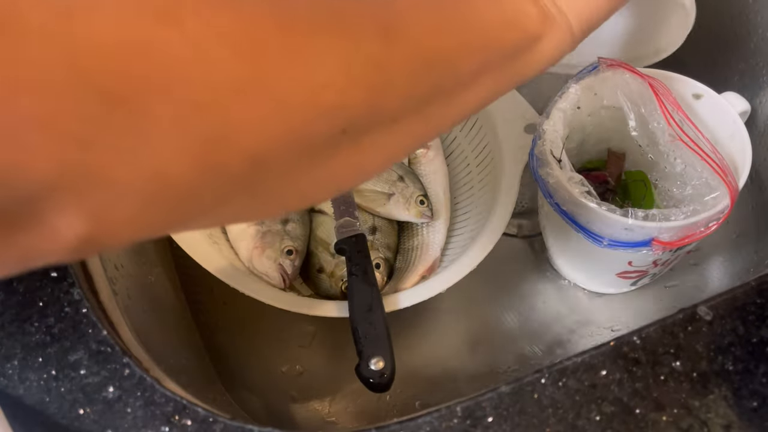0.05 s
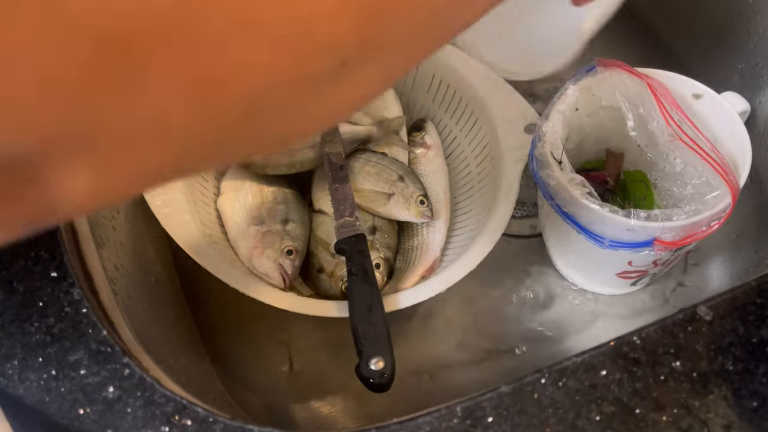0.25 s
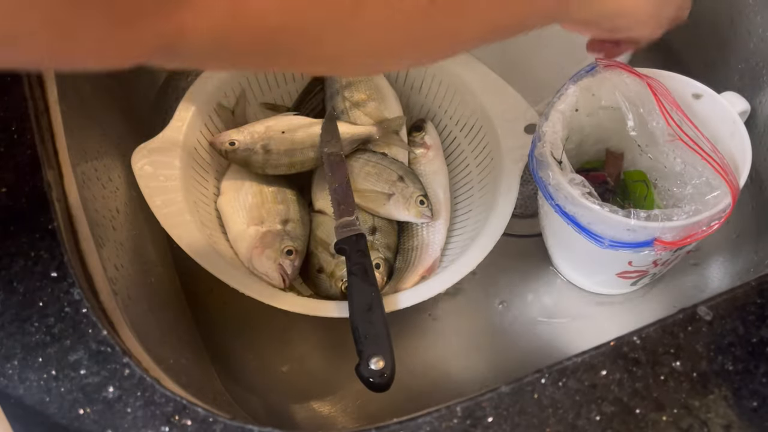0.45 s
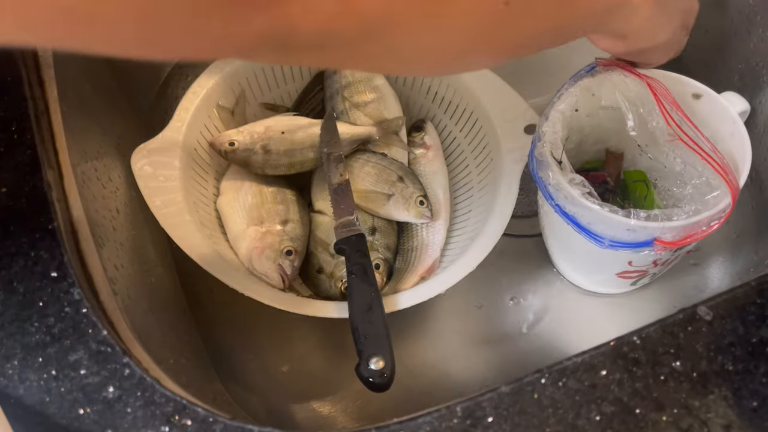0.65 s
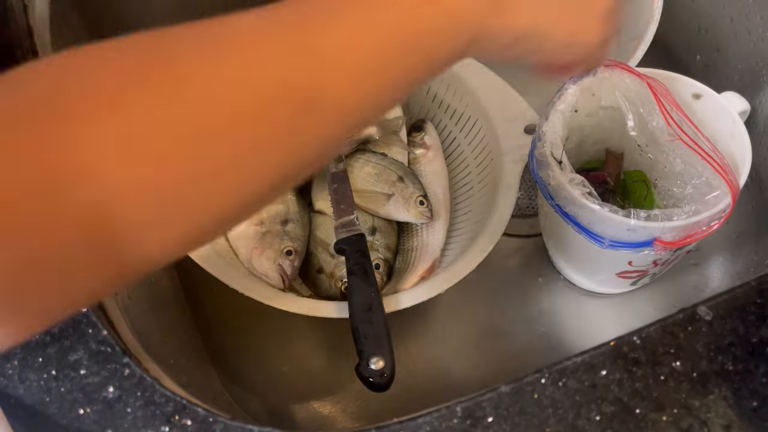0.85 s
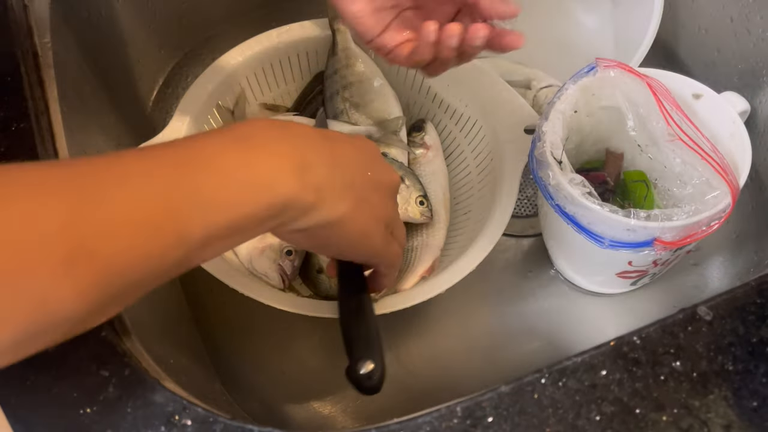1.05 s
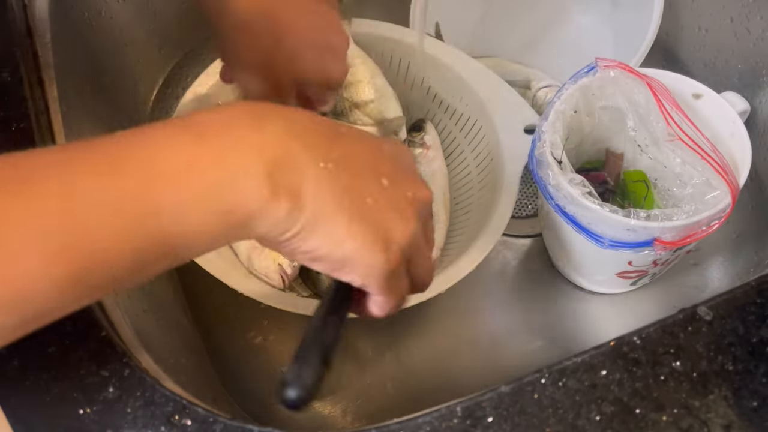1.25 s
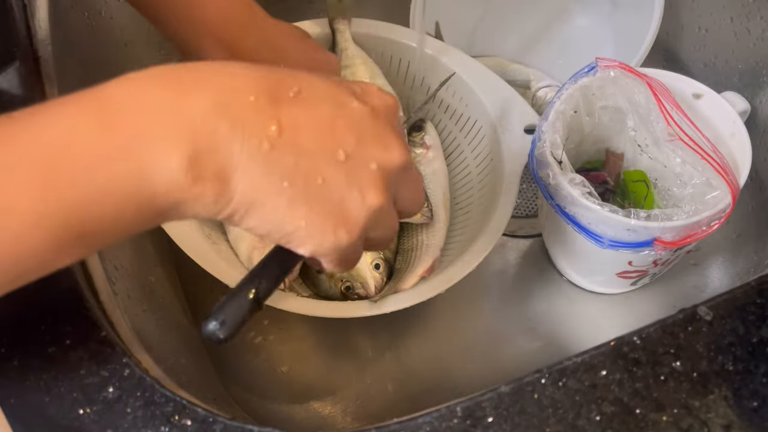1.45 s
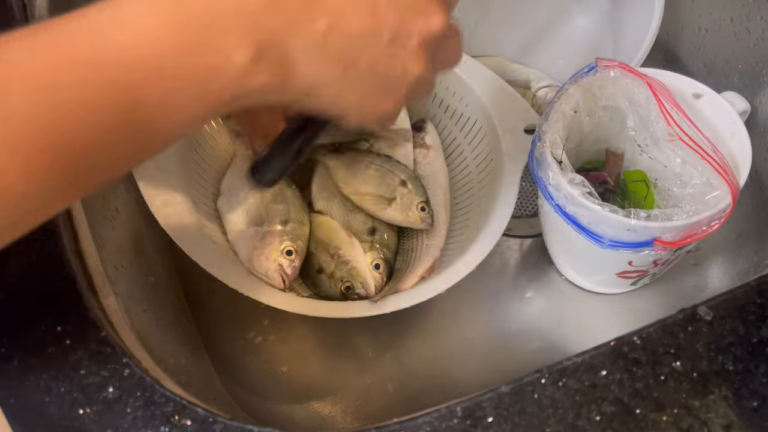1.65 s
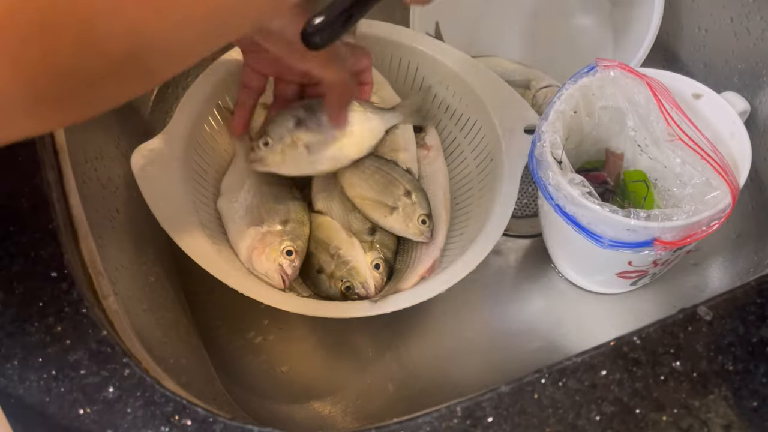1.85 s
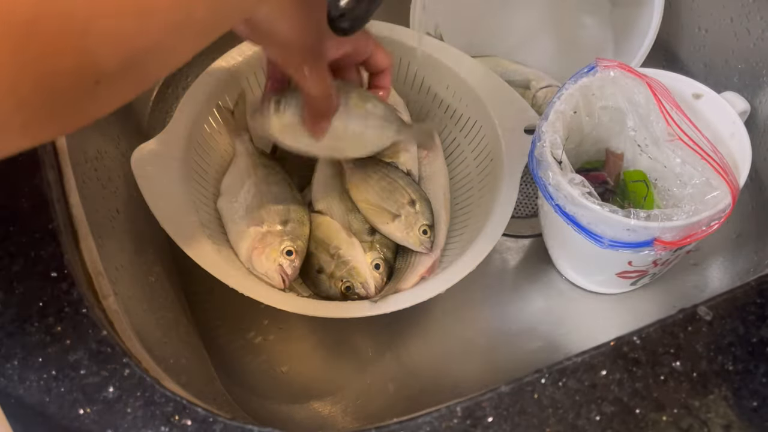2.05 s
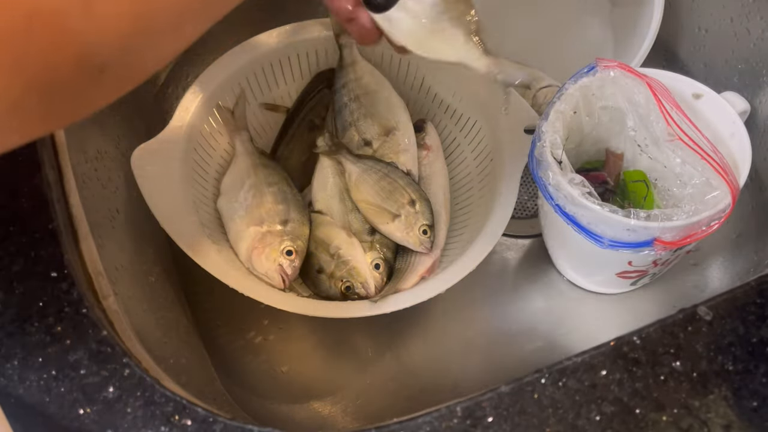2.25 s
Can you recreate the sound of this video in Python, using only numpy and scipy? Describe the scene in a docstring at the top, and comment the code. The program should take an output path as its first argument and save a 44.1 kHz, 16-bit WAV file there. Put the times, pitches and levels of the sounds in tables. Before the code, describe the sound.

Water runs thinly into a steel kitchen sink, with dull knocks and small wet scrapes

```python
"""In a small kitchen a tap runs thinly into a steel sink: filtered spray and short droplets hiss and spatter,
and bands of noise drum on the steel and rumble hollowly in the basin.
In the first second five dull knocks, as things are set down and a knife is taken from a colander of fish,
excite damped modes with dispersed bending waves. Wet scrapes are tiny noise snaps; soft bumps of band noise
add body to knocks and thud between them. A close pair of microphone ports hears it, with a short diffuse tail."""
import sys
import numpy as np
from scipy import signal
from scipy.fft import rfft, irfft
from scipy.io import wavfile
from scipy.ndimage import uniform_filter1d

SR = 44100
rng = np.random.default_rng(int(sys.argv[2]) if len(sys.argv) > 2 else 0)


def bounce(signal):
    """Save signal as a 16-bit WAV file at the path given by the first command-line argument."""
    frames = np.transpose(np.atleast_2d(signal))
    limited = np.clip(frames, -1, 1)
    pcm = np.round(limited * 32767).astype(np.int16)
    wavfile.write(sys.argv[1], SR, pcm)


N = 101429


def amp(db):
    """Level to amplitude: 20 dB is a factor of ten."""
    return 10 ** (np.asarray(db) / 20)


def unit(x):
    """Normalizes the mean power to one."""
    return x / np.sqrt(np.mean(x ** 2) + 1e-20)


def read(points, hz):
    """Interpolates a table along a logarithmic frequency axis."""
    table_hz, value = np.transpose(points)
    return np.interp(np.log(hz + 1), np.log(table_hz + 1), value)


def level(points):
    """Amplitude envelope: a level curve in dB, interpolated in time."""
    return amp(np.interp(np.arange(N) / SR, *np.transpose(points)))


def add(mix, start_s, sound):
    """Superposition: sums a two-channel sound into the mix from its start time."""
    part = mix[:, max(round(start_s * SR), 0):][:, :sound.shape[1]]
    part += sound[:, :part.shape[1]]


def bins(x):
    """Frequencies of the discrete spectrum of x."""
    return np.fft.rfftfreq(x.shape[-1], 1 / SR)


def colour(x, points):
    """Linear filtering: multiplies the spectrum by a response in dB."""
    return irfft(rfft(x) * amp(read(points, bins(x))), x.shape[-1])


def band(x, hz, octaves):
    """Band-pass filtering with a Gaussian bell on an octave scale."""
    distance = np.log2((bins(x) + 1) / hz) / octaves
    return irfft(rfft(x) * np.exp(-.5 * distance ** 2), x.shape[-1])


def noise(size):
    """Two uncorrelated rows of white noise."""
    return rng.standard_normal((2, size))


def wobble(db, seconds):
    """Random amplitude modulation: low-passed noise, db in rms, slower for longer times."""
    smoothing = np.exp(-(bins(np.empty(N)) * seconds) ** 2)
    return amp(db * unit(irfft(rfft(rng.standard_normal(N)) * smoothing, N)))


def ports(x):
    """Spatial coherence: mid and side parts set the correlation of two close ports by frequency."""
    # correlation between the ports: frequency_hz, likeness (0-1)
    port_likeness = [(20, .999), (450, 1), (800, 0.9), (1000, 0.63), (1300, 0.8), (2000, 1), (3100, 1),
                     (4200, 0.78), (7800, 0.9), (8400, 1), (9200, 0.81), (9700, 0.85), (12000, 0.86),
                     (13000, 1), (14200, 1), (15700, 0.7)]
    same = np.clip(read(port_likeness, bins(x)), 0, 1)
    a, b = rfft(x)
    mid = a * np.sqrt((1 + same) / 2)
    side = b * np.sqrt((1 - same) / 2)
    return irfft(np.array([mid + side, mid - side]), x.shape[-1])


def kitchen(x, size=256):
    """Diffuse reverberation: convolution with noise whose bands decay at their own rates."""
    # reverberation time: frequency_hz, t60_s
    room = [(120, 0.19), (550, 0.37), (1300, 0.23), (4000, 0.31), (14000, 0.074)]
    # response of the tail: frequency_hz, gain_db
    room_colour = [(150, -3.5), (370, 1.5), (580, 0.5), (800, 3), (1300, 3.5), (2500, -1), (10000, 4)]
    BUILD_S, APART = 0.0093, 0.13  # build-up time; amplitude of an added part unrelated between the ports
    diffuse = ports(noise(SR // 2)) + APART * noise(SR // 2)
    hz, t, z = signal.stft(diffuse, SR, nperseg=size)
    decay = amp(-60 * t / read(room, hz)[:, None])
    build_up = 1 - np.exp(-(t / BUILD_S) ** 2)
    tail = signal.istft(z * decay * build_up, SR, nperseg=size)[1]
    response = colour(tail / np.linalg.norm(tail[0]), room_colour)
    return signal.fftconvolve(x, response, axes=1)[:, :x.shape[1]]


def rumble():
    """Cavity resonance: noise with low peaks gives the hollow tone of the basin."""
    # spectral density of the rumble: frequency_hz, density_db (per Hz)
    rumble_density = [(20, -104), (45, -102), (65, -84), (110, -73.5), (155, -86), (222, -72.5),
                      (265, -74.5), (310, -85.5), (500, -85), (900, -103.5), (2000, -104), (6000, -120)]
    return colour(noise(N), rumble_density)


def drumming():
    """Random impact excitation: lumpy noise is shaped by the steel under the stream."""
    # spectral density before the level curve: frequency_hz, density_db (per Hz)
    drum_density = [(200, -118.5), (400, -89.5), (540, -85), (670, -82), (950, -90), (1270, -84.5),
                    (1450, -90), (1750, -100), (4000, -115)]
    # relative level of the drumming: time_s, level_db
    drum_level = [(0, 3.5), (.2, -3.5), (.8, 1.5), (1.15, -7.5), (1.3, 1), (1.6, 0.5), (1.86, 2.5),
                  (1.91, -10), (1.97, -3), (2.15, -6.5), (2.3, -8)]
    PATTER_DB, PATTER_S = 2.0, 0.0065  # rms depth and time scale of the small lumps
    return colour(noise(N) * wobble(PATTER_DB, PATTER_S), drum_density) * level(drum_level)


def drops(count=28):
    """Shot noise: random droplets, each a damped sine of a few cycles, sum to a white average."""
    DROPS_PER_S, SPREAD_DB = 3200, 3  # nominal rate over all pitches; mean size spread before its cap
    out, t = np.zeros((2, N)), np.arange(SR // 100) / SR
    for hz in np.geomspace(1500, 16000, count):
        spread = np.minimum(rng.exponential(1, (2, N)), 4)
        size = amp(SPREAD_DB * spread) * np.sign(noise(N))
        # higher pitches have more droplets
        train = size * (rng.random((2, N)) < DROPS_PER_S * hz / 6000 / count / SR)
        age = t * hz / 2.6
        droplet = age * np.exp(-age) * np.sin(2 * np.pi * hz * t)
        # power in proportion to frequency makes log-spaced pitches white
        out += np.sqrt(hz) * unit(signal.oaconvolve(train, droplet[None])[:, :N])
    return unit(out)


def spray(size=256):
    """Modulated noise: fine spray flickers as a whole and in patches of time and frequency."""
    PATCH_DB, FLICKER_DB = 0.63, 3  # rms depths
    z = signal.stft(noise(N), nperseg=size)[2]
    patches = uniform_filter1d(rng.standard_normal(z.shape[1:]), size=10, axis=0)
    patches = unit(uniform_filter1d(patches, size=5, axis=1))
    flicker = unit(uniform_filter1d(rng.standard_normal(z.shape[2]), size=2))
    gain = amp(PATCH_DB * patches + FLICKER_DB * flicker)
    return unit(signal.istft(z * gain, nperseg=size)[1][:, :N])


def hissing():
    """Broadband flow noise: spray and droplets, whose level sways with the stream."""
    # response before the level curve: frequency_hz, gain_db
    hiss_response = [(500, -104), (1800, -95.5), (2600, -95), (3400, -90.5), (5800, -89), (7500, -88.5),
                     (9000, -86), (12000, -81.5), (14000, -81.5), (15000, -76.5), (16000, -78.5)]
    # relative level of the hiss: time_s, level_db
    hiss_level = [(0, 5.5), (.2, 0.5), (.45, 3), (.8, 1), (1.05, 0), (1.2, -2), (1.45, 2.5), (1.72, 0),
                  (1.9, 0), (2.3, -0.5)]
    SPRAY_DB, DROPS_DB = -2, -7  # shares in the mixture
    SWAY_DB, SWAY_S = 1.07, 0.034  # rms depth and time scale of the irregular sway
    water = amp(SPRAY_DB) * spray() + amp(DROPS_DB) * drops()
    return colour(water, hiss_response) * level(hiss_level) * wobble(SWAY_DB, SWAY_S)


def tap():
    """Superposed flow noises: hiss, drumming on the steel and the basin's low resonances."""
    # the factor gives white noise of rms one a density of 0 dB per Hz
    return ports(hissing() + drumming() + rumble()) * np.sqrt(SR / 2)


def bump(level_db, decay_s, centre_hz):
    """Overdamped impact: a soft push of band noise decays with no clear ring."""
    RISE_S, WIDTH_OCTAVES = 0.001, 0.56
    t = np.arange(SR // 4) / SR
    push = unit(band(ports(noise(len(t))), centre_hz, WIDTH_OCTAVES))
    return amp(level_db) * push * (1 - np.exp(-t / RISE_S)) * np.exp(-t / decay_s)


def splash(level_db, decay_s, centre_hz, width_octaves):
    """Granular impulse noise: a quick clump of tiny wet snaps in one band."""
    RISE_S, SNAPS_PER_S = 0.00062, 3600
    t = np.arange(SR // 5) / SR
    snaps = noise(len(t)) * (rng.random((2, len(t))) < SNAPS_PER_S / SR)
    wet = unit(band(ports(snaps), centre_hz, width_octaves))
    return amp(level_db) * wet * (1 - np.exp(-t / RISE_S)) * np.exp(-t / decay_s)


def knock(boom_db, thud_db, ring_db, clonk_db, clang_db, rattle_db, tick_db, contact_s, ring_length, room_db):
    """Modal and dispersive excitation: a tick, then a downward-sweeping bending wave and ringing modes."""
    # centres of the mode families, boom to rattle: frequency_hz
    family_hz = [260, 400, 580, 820, 1200, 2400]
    # modes of the sink before the body response: frequency_hz, gain_db, t60_s (before ring_length)
    sink_modes = [(115, -13, 0.23), (164, -15, 0.17), (223.5, -7.5, .09), (271, -12, 0.087),
                  (364, -5.5, 0.11), (475.4, -10.5, 0.096), (570, -3.5, 0.082), (623, -11, 0.028),
                  (698, -10.5, 0.082), (829, -3, 0.051), (1123, -4, 0.025), (1168, -7, 0.054),
                  (1277, -10, 0.14), (1410, -3, 0.066), (2322, 1.5, 0.031), (2480, -2, 0.029),
                  (2690, -29, 0.08), (3386, 4, 0.031), (4335, 0, 0.054), (5340, -5, .035)]
    # overall response of the steel basin: frequency_hz, gain_db
    body = [(20, -59), (60, -42), (110, -13), (170, -6.5), (240, 2.5), (500, 0), (830, -1.5), (970, -15.5),
            (1150, -1.5), (1450, -4.5), (1700, -12), (2400, -11), (3400, -13.5), (4700, -24), (6500, -23.5),
            (16000, -24)]
    # relative colour of a hard contact: frequency_hz, gain_db
    tick_colour = [(200, -47), (1200, 11), (2500, 3), (5200, 5), (7000, -11.5), (9000, 5), (12000, -3.5),
                   (16000, -7)]
    SPREAD_S, LEAD_S = .004, 0.001203  # travel times: bending wave at 1 kHz, contact tick
    PUSH_S = 0.0013  # first passing wave, as the length of a unit push
    CROWD_DB, CROWD_T60_S, CROWD_RISE_S = 13, 0.066, 0.00066  # many small modes between the main ones
    t = np.arange(SR // 2) / SR

    modes = 0
    for hz, db, t60 in sink_modes:
        modes = modes + amp(db - 60 * t / (t60 * ring_length)) * np.cos(2 * np.pi * hz * t)
    crowd_decay = amp(CROWD_DB - 60 * t / (CROWD_T60_S * ring_length))
    crowd = ports(noise(len(t))) * crowd_decay * (1 - np.exp(-t / CROWD_RISE_S))
    push = PUSH_S * SR * (t == 0)

    # the spot that is struck decides how strongly each family answers
    spot = list(zip(family_hz, (boom_db, thud_db, ring_db, clonk_db, clang_db, rattle_db)))
    steel = colour(colour(push + modes + crowd, body), spot)

    # bending waves travel faster at high frequency, so low ones arrive later
    hz = bins(t)
    lag_cycles = 2 * SPREAD_S * np.sqrt(1000 * hz) - LEAD_S * hz
    fade = np.clip(2 - 2 * t / t[-1], 0, 1) ** 2
    steel = irfft(rfft(steel) * np.exp(-2j * np.pi * lag_cycles), len(t)) * fade

    tick = unit(colour(ports(noise(len(t))), tick_colour)) * amp(tick_db) * np.exp(-t / contact_s)
    hit = steel + tick
    return hit + amp(room_db) * kitchen(hit)


def scene():
    """Superposition of direct and reverberant sound: tap, bumps, splashes and knocks."""
    # soft low bumps, several thickening the body of a knock: start_s, level_db, decay_s, centre_hz
    bump_events = [(0.003, -39, 0.036, 420), (0.085, -47.5, .06, 187), (0.155, -47.5, 0.033, 398),
                   (0.256, -35.5, 0.017, 198), (0.521, -25.5, 0.011, 430), (0.662, -26, .016, 576),
                   (0.946, -27.5, 0.0084, 292), (0.9685, -29, 0.0045, 1270), (0.975, -41.5, 0.027, 176),
                   (1.07, -48.5, .04, 370), (1.317, -45, .02, 240), (1.612, -38.5, 0.016, 247),
                   (1.787, -45, .012, 1100), (1.953, -52.5, 0.016, 1300)]
    # wet scrapes and splashes: start_s, level_db, decay_s, centre_hz, width_octaves
    splash_events = [(0.012, -34, 0.0085, 8900, 0.7), (0.0555, -34, 0.0044, 6000, 0.4),
                     (0.0935, -33, 0.0052, 4950, 0.4), (0.148, -41, 0.0075, 3110, 0.12),
                     (0.1605, -26.5, 0.0045, 12000, 0.5), (0.2360, -35, 0.0076, 2900, 0.41),
                     (0.266, -35, 0.025, 9600, 1.8), (0.366, -39, 0.0098, 10500, .5),
                     (0.5132, -28, 0.005, 12100, .5), (0.7570, -41, 0.03, 10200, 0.55),
                     (0.7968, -24.5, 0.0023, 7900, 0.23), (0.8660, -28, 0.0058, 13400, 0.39),
                     (0.9225, -40, 0.0045, 8000, 1.2), (0.9675, -24, .005, 5230, 1.9),
                     (0.9972, -29.5, 0.0043, 8600, 0.61), (1.036, -36, 0.0037, 4900, 0.31),
                     (1.1245, -31, 0.0029, 12200, 0.68), (1.155, -44, 0.0098, 3670, 0.34),
                     (1.2697, -29.5, 0.0056, 9700, 0.82), (1.3955, -35.5, 0.0039, 4550, .7),
                     (1.612, -38.5, 0.009, 10800, 0.9), (1.865, -38.5, 0.042, 9600, 0.49),
                     (1.868, -44, 0.0076, 4600, 0.23), (2.0285, -33, 0.0033, 10300, 0.19),
                     (2.0665, -36, 0.022, 7100, 0.66), (2.120, -41.5, 0.0027, 5260, .4),
                     (2.1620, -40, 0.018, 4940, 0.55), (2.178, -37, 0.013, 10600, 0.35),
                     (2.2225, -37, 0.0023, 4840, 0.75), (2.233, -36, 0.0045, 10400, .3)]
    # knocks on the sink: start_s, boom_db, thud_db, ring_db, clonk_db, clang_db, rattle_db, tick_db,
    # contact_s (decay of the tick), ring_length (factor), room_db
    knock_events = [(0.241, -20, -15, -33, -36.5, -33, -40.5, -36.5, 0.0096, 0.8, -22),
                    (0.3176, -30.5, -29, -11.5, -30.5, -31, -22.5, -17, 0.0021, 0.88, -20),
                    (0.5312, -17, -17.5, -18, -14, -15, -20.5, -20.5, 0.0018, 0.88, -21),
                    (0.6532, -28.5, -19, -16, -27.5, -16, -22, -26.5, 0.0034, 1.17, -23),
                    (0.9381, -21, -31, -29, -30, -26, -26.5, -25, 0.0012, 0.85, -20.5)]
    ROOM_DB = -16  # room level of the splashes and bumps
    knocks, soft_sounds = np.zeros((2, 2, N))
    for start_s, *row in bump_events:
        add(soft_sounds, start_s, bump(*row))
    for start_s, *row in splash_events:
        add(soft_sounds, start_s, splash(*row))
    for start_s, *row in knock_events:
        add(knocks, start_s, knock(*row))
    return tap() + soft_sounds + amp(ROOM_DB) * kitchen(soft_sounds) + knocks


def record(dry):
    """Phase difference between ports: the right lags in the treble; a low-pass limits the band."""
    # phase lead of the left port: frequency_hz, phase_rad
    port_phase = [(20, 0), (3000, 0), (4500, .55), (5900, .55), (6800, 1.6), (7300, 3.1), (7600, 4.8),
                  (8400, 6.25), (9400, 6.35), (10000, 7.1), (11500, 8.2), (12600, 9.25), (13900, 9.45),
                  (16000, 10.5)]
    EDGE_HZ = 15820
    right = irfft(rfft(dry[1]) * np.exp(-1j * read(port_phase, bins(dry))), N)
    low_pass = signal.firwin(511, EDGE_HZ, window=("kaiser", 9), fs=SR)
    return signal.oaconvolve(np.array([dry[0], right]), low_pass[None], "same")


dry = scene()
out = record(dry)
bounce(out)
```